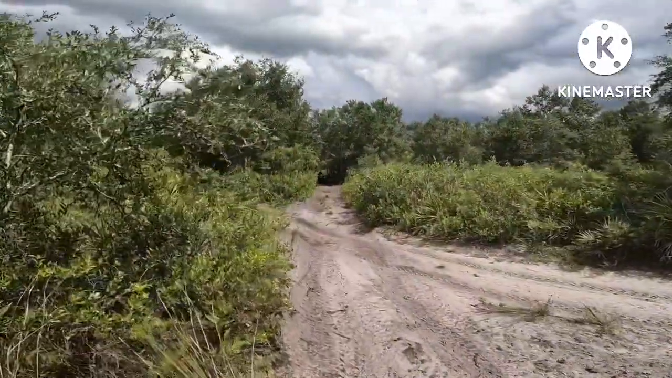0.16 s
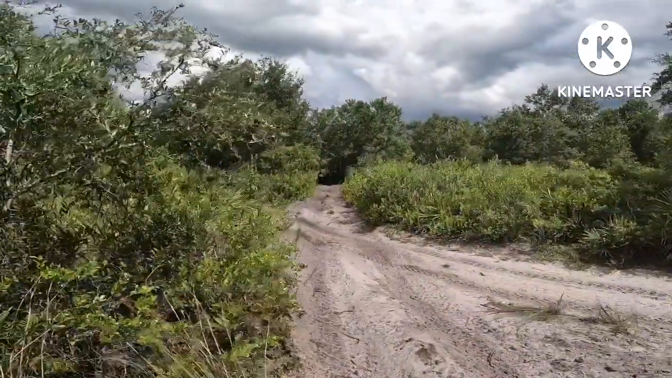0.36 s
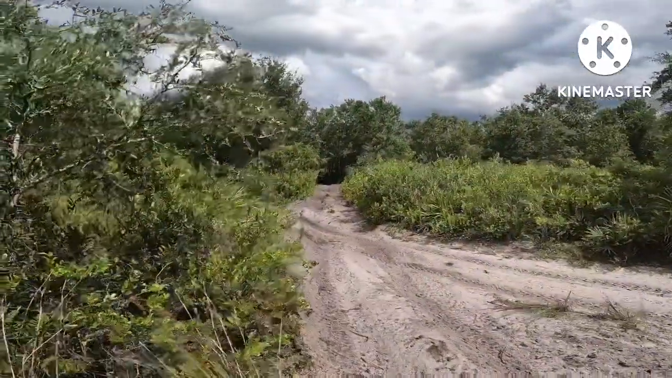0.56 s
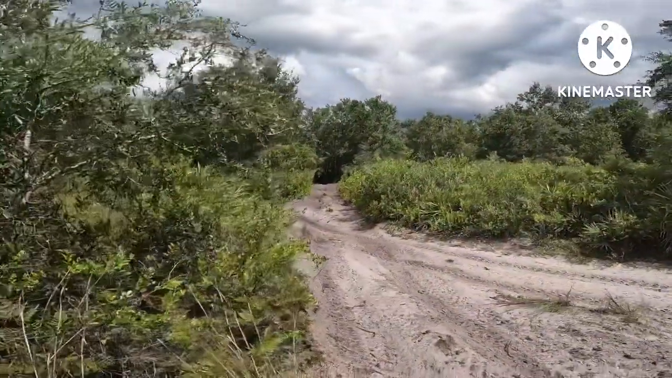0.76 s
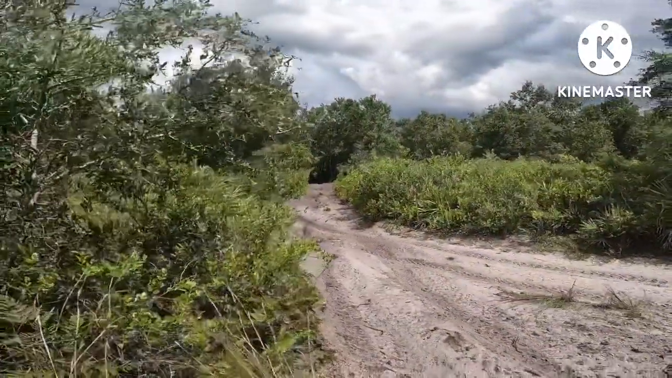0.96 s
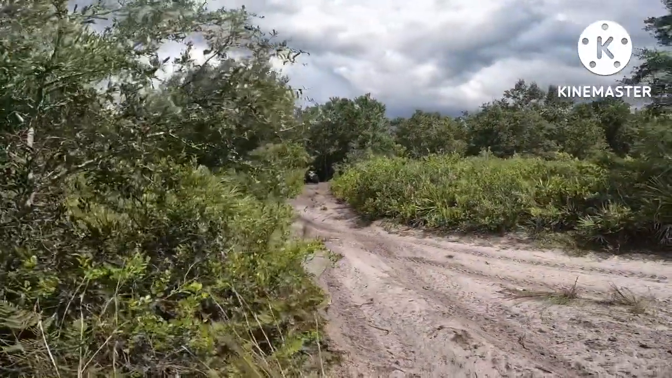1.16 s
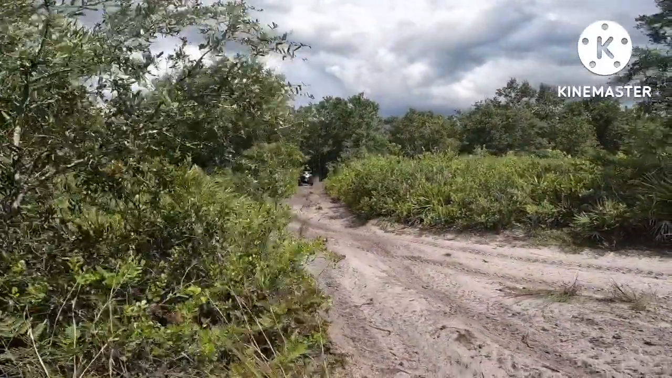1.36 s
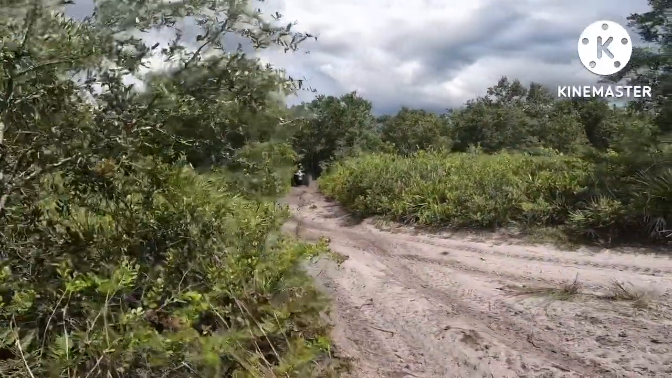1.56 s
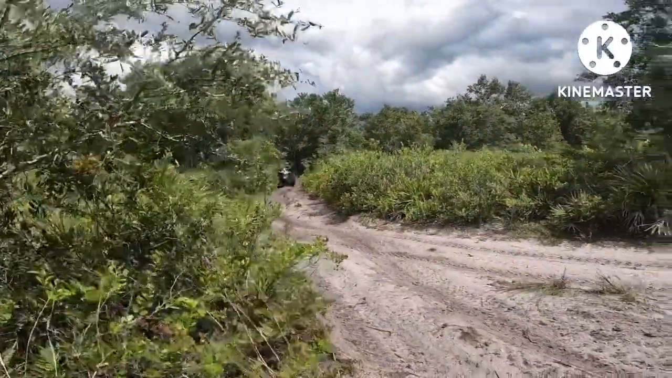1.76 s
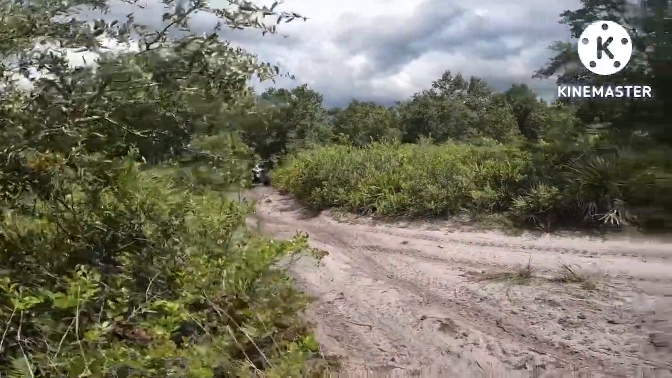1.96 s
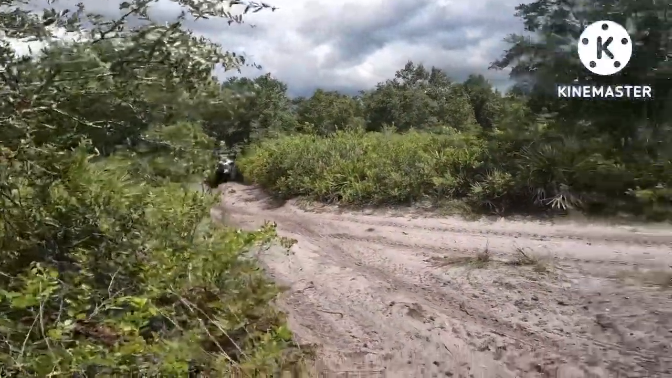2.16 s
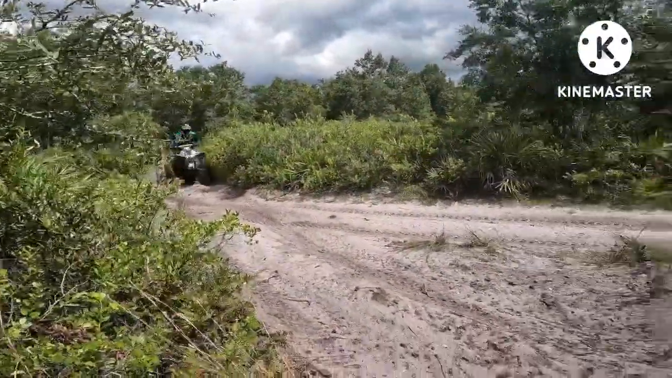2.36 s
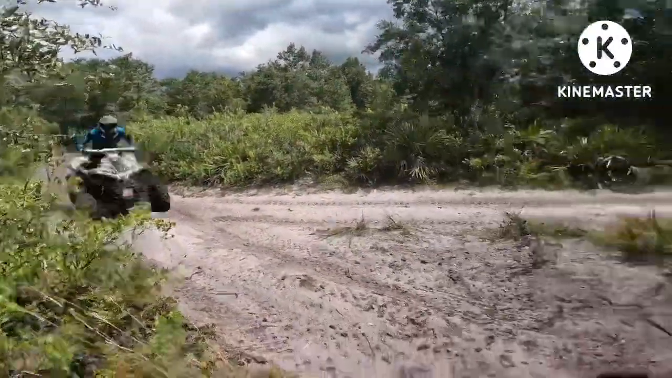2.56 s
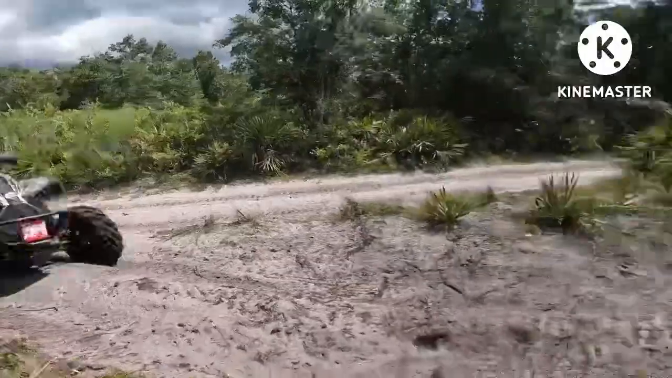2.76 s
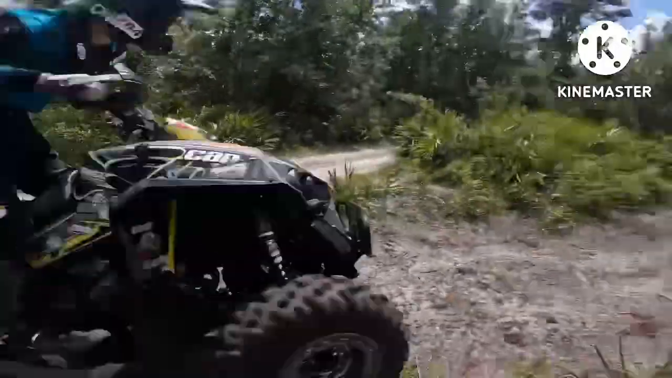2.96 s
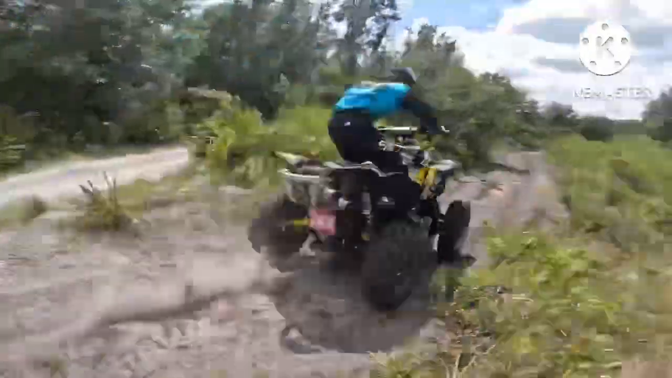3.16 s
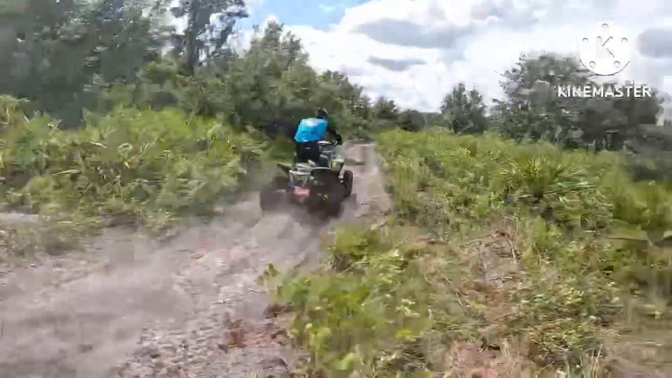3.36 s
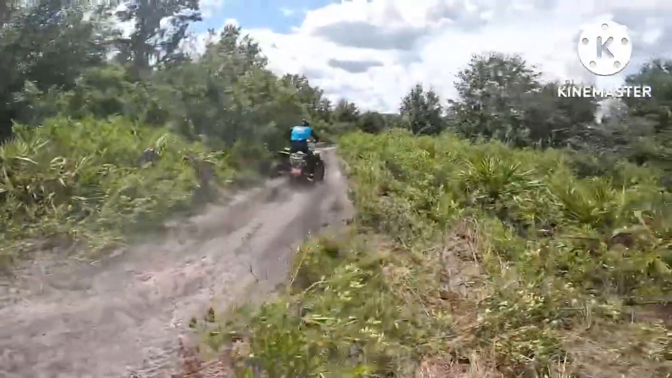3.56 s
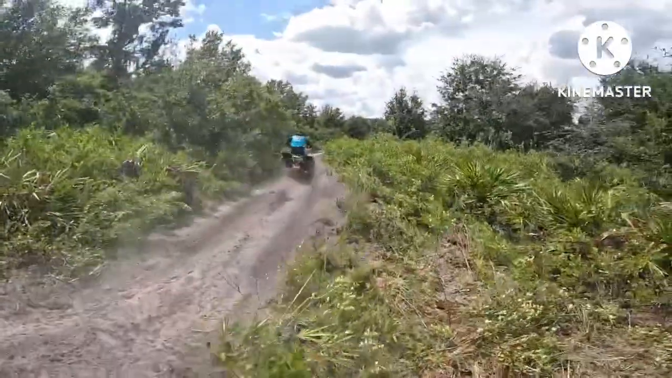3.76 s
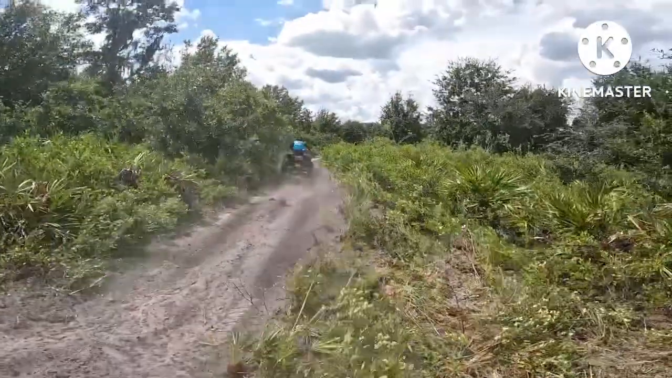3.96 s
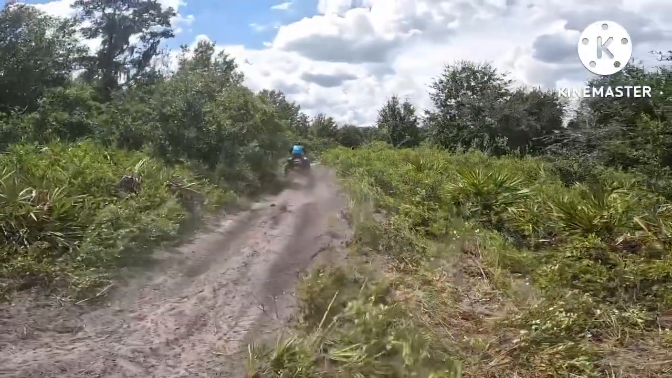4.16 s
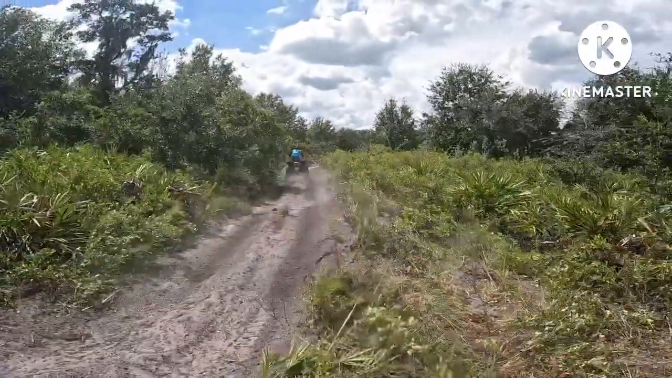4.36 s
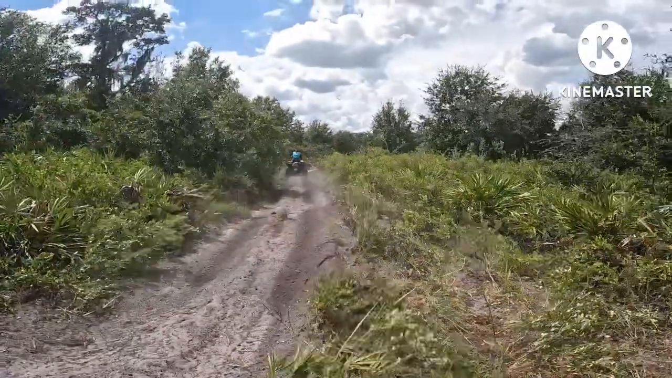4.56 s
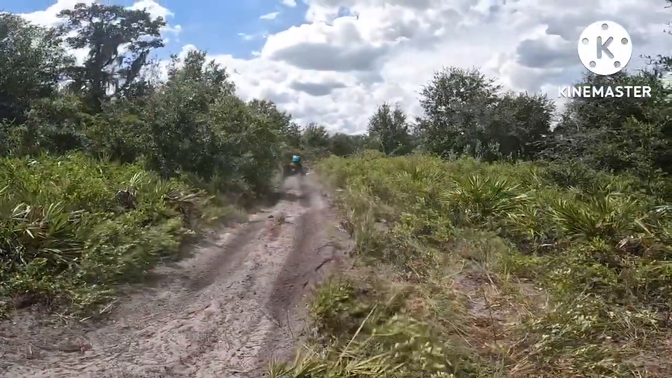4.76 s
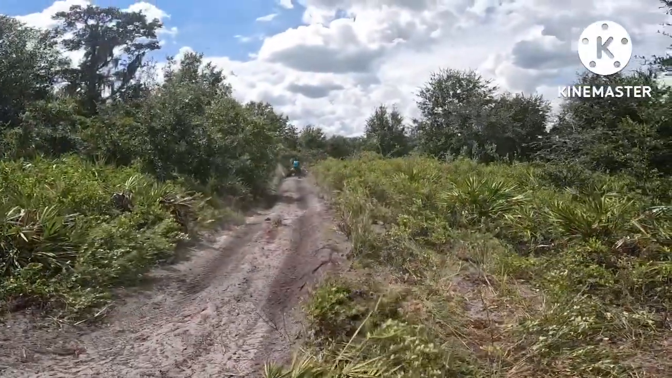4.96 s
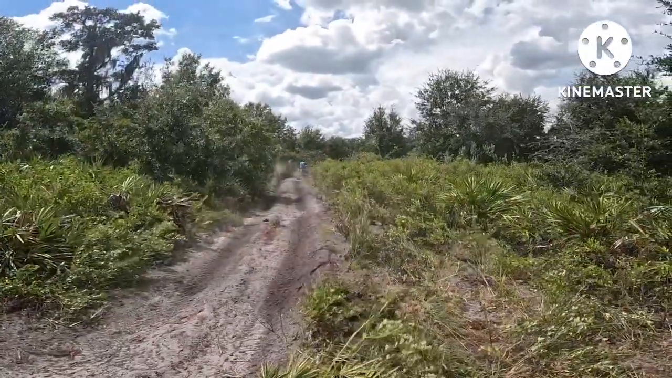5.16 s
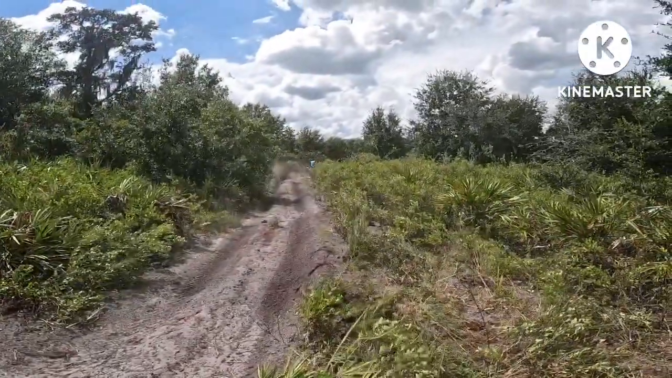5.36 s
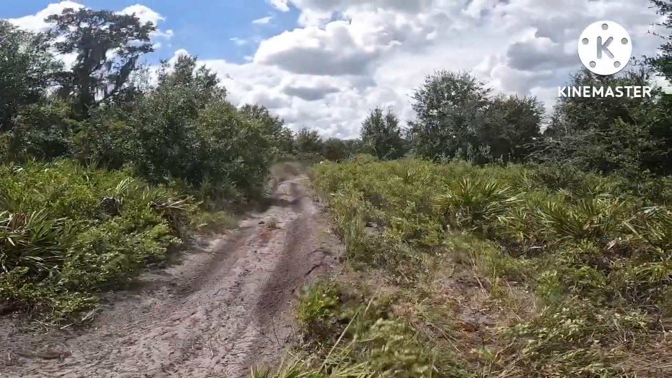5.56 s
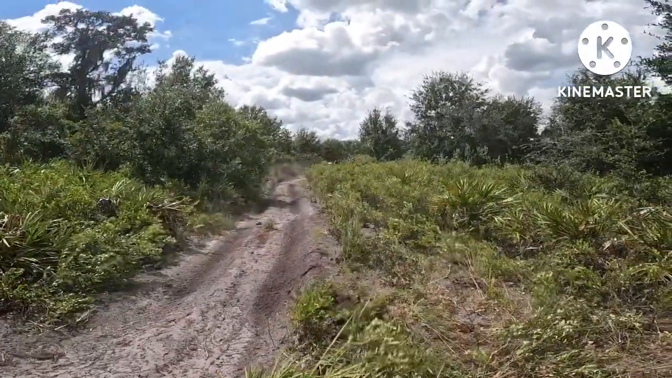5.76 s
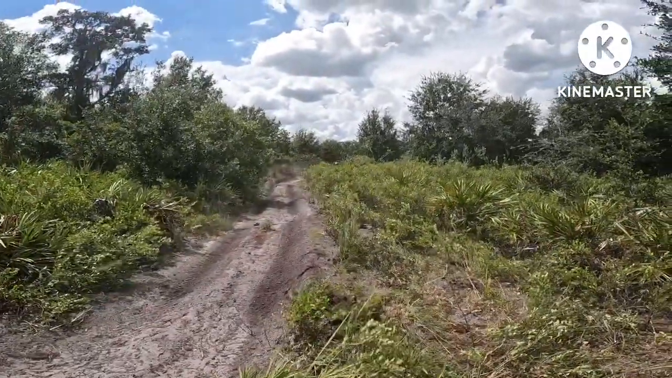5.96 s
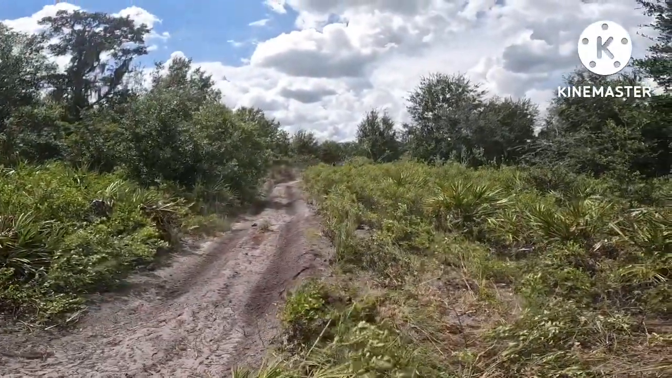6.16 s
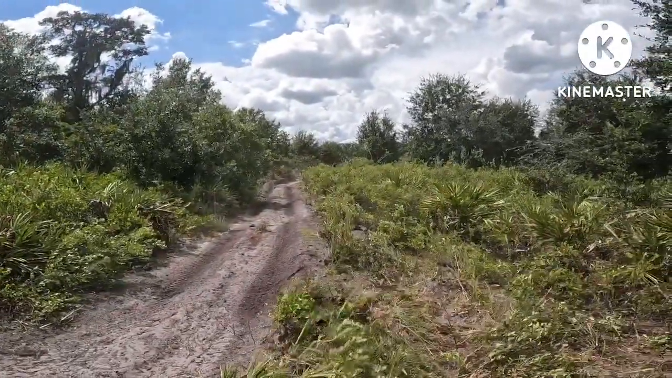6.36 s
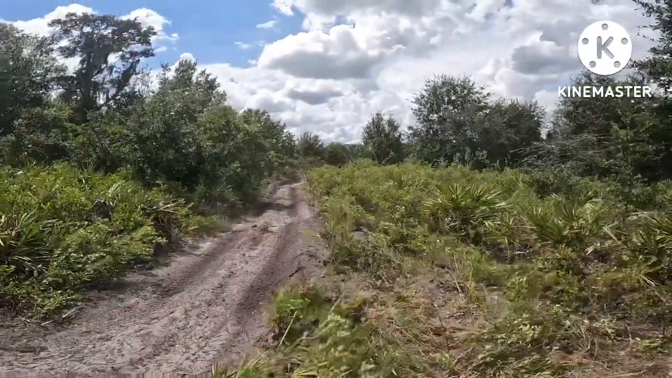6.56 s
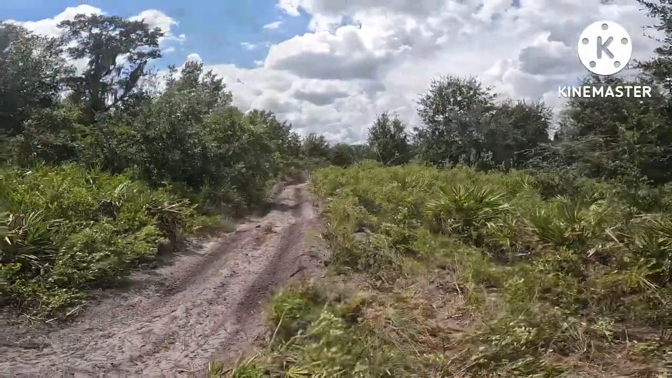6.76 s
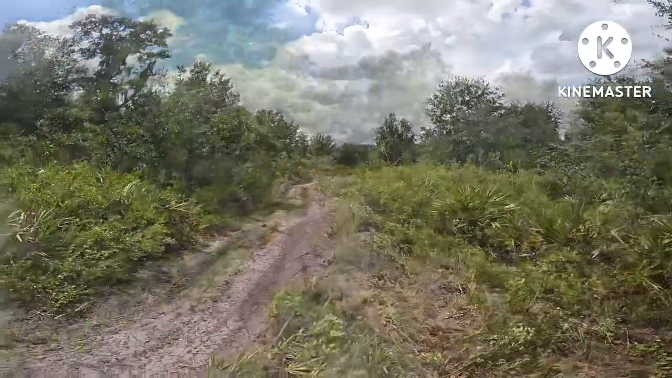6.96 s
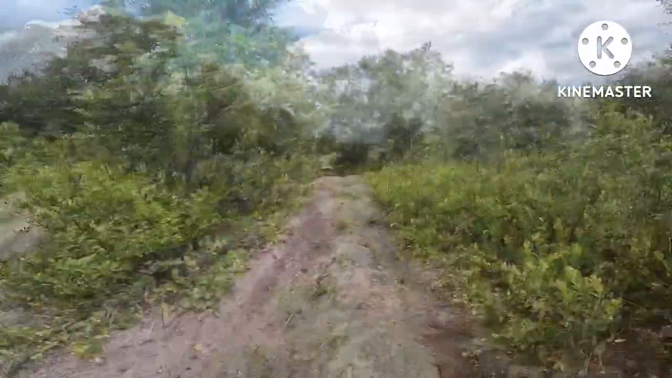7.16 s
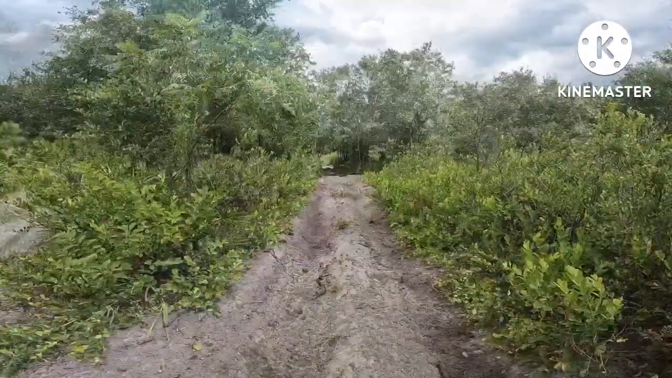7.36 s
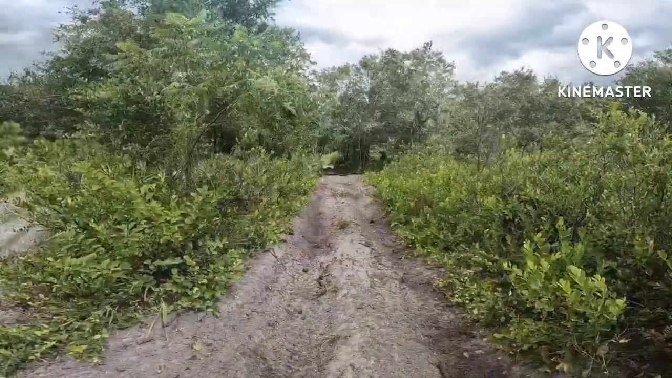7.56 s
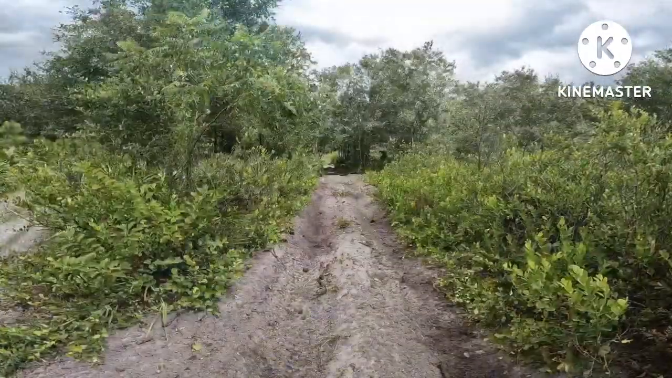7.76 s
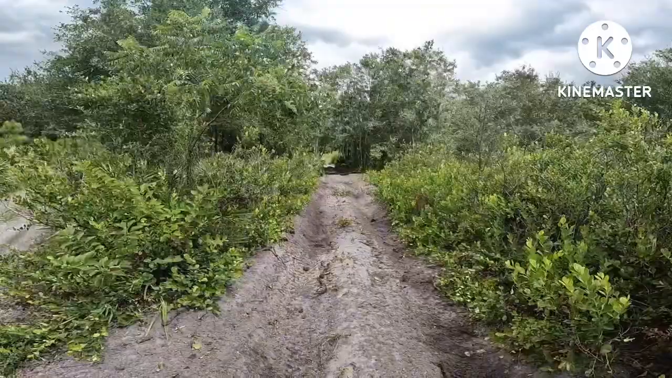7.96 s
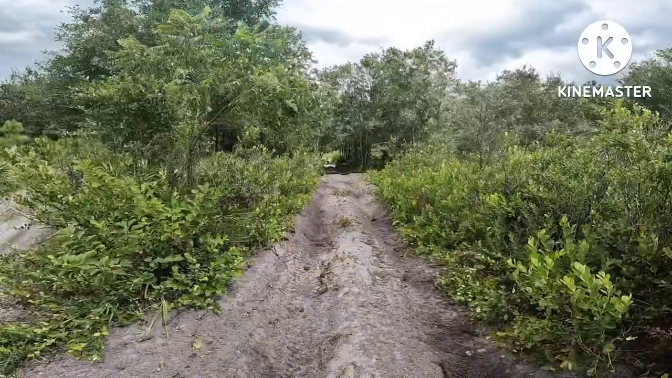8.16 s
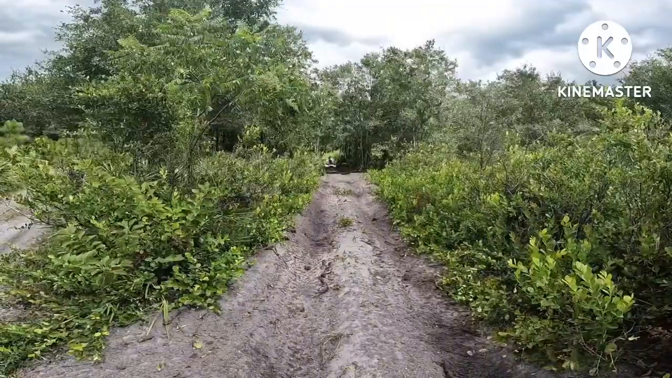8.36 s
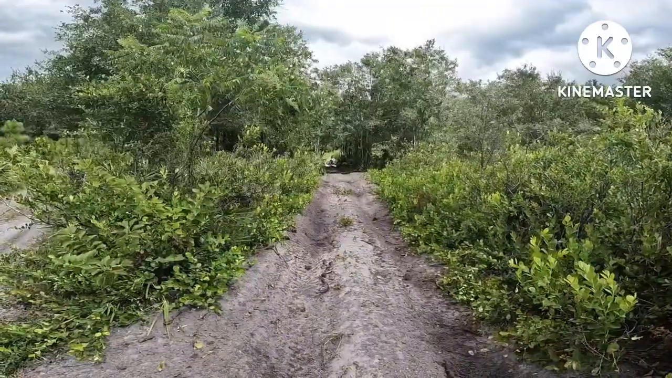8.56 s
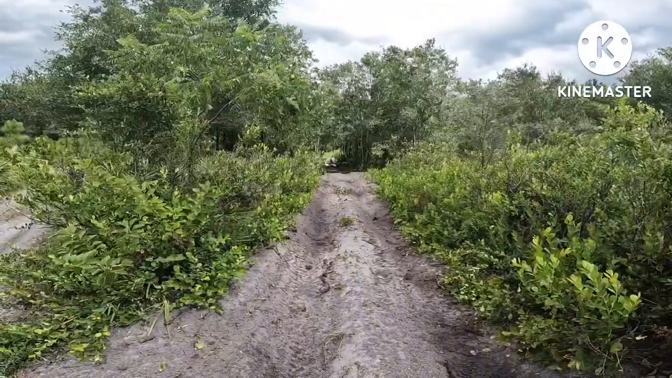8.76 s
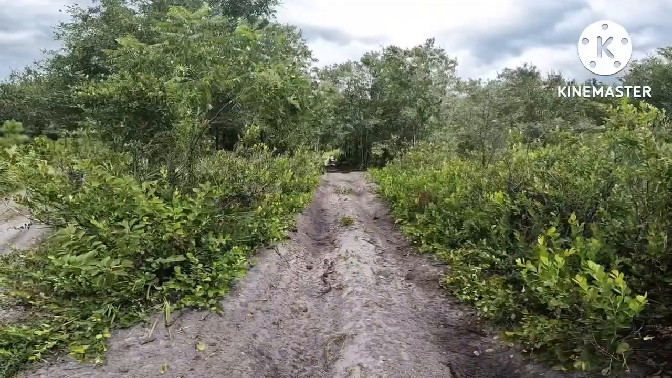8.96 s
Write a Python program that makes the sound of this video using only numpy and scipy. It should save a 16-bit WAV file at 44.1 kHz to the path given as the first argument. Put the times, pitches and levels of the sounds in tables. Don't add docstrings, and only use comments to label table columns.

```python
import sys
import numpy as np
from scipy import signal
from scipy.fft import rfft, irfft, next_fast_len
from scipy.io import wavfile
from scipy.ndimage import uniform_filter1d, map_coordinates

SR = 44100
rng = np.random.default_rng(int(sys.argv[2]) if len(sys.argv) > 2 else 0)


def boost(x):
    u = np.asarray(x, float) / 20
    return 10 ** u


def waveform_to_disk(signal):
    frames = np.transpose(np.atleast_2d(signal))
    scaled = np.clip(frames, -1, 1) * 32767
    samples = np.round(scaled).astype(np.int16)
    wavfile.write(sys.argv[1], SR, samples)


N = 397782

# first pulse t/s, shutting t/s, starting revs/(cycles/s), ending revs/(cycles/s), throttle/0-1
BLIPS = [(0, .492, 57, 62.5, 1), (.583, 1.506, 52, 54.3, 1), (1.62, 2.374, 49.8, 53.5, 1),
         (2.474, 2.574, 50.3, 49.5, 1), (2.698, 2.826, 46.8, 50, 1), (2.955, 3.05, 43.9, 45.5, 1),
         (3.215, 3.335, 40.1, 40.8, 1), (3.37, 3.497, 40.6, 38.8, .8), (4.628, 4.665, 26.8, 27.6, 1),
         (4.724, 5.139, 29, 53.1, 1), (5.242, 5.573, 45.7, 49.5, 1), (5.653, 6.253, 43.6, 53.2, 1),
         (6.442, 6.52, 41.3, 42.5, .7), (6.645, 6.8, 38.8, 40.7, .5), (6.921, 7.0, 38.1, 39.6, .7),
         (7.217, 7.25, 35, 36.2, .5), (7.905, 8.34, 30.4, 48.3, .8), (8.525, 9.05, 38.5, 57.2, .9)]
# start level/dB, crest level/dB, end level/dB
BITES = [(-6, 2, -2.5), (-2.5, -1.4, -0.2), (-1, -1.5, -4.5), (-8, -6, -6), (-4.5, -4, -6),
         (-4.5, -2.5, -6), (-2.5, -3, 6), (0.5, -1.8, 3), (-1, 8.5, 21), (-6.5, -1.5, 1.5),
         (1.5, -1.5, -1.3), (-1.5, -0.5, -2.5), (4.5, 3, 2), (1, -4, -10), (5, 3, 1), (12, -11, 10),
         (-10, 4, -4), (-0.5, 1.5, -1)]
# t/s, change/(cycles/s), rise/s, fall/s
RUTS = [(.2, -4, .2, .22), (.68, -1.3, .1, .04), (.8, 2.9, .1, .25), (1.21, 9, .25, .11),
        (1.4, -1.6, .08, .07), (2.16, 6.8, .4, .18), (2.61, -2.4, .07, .06), (3.84, -2, .17, .12),
        (4.27, 2.1, .15, .2), (4.52, -.9, .1, .08), (4.96, 1.8, .26, .14), (5.3, -2.9, .09, .23),
        (5.74, -1.8, .12, .08), (5.88, 4.8, .16, .16), (6.1, -1.7, .08, .11), (6.58, -1.3, .08, .03),
        (7.31, 2.9, .09, .25), (8.04, -2, .17, .13), (8.82, 3.3, .32, .2)]
# t/s, lag/cycles, throttle/0-1
TRAILING = [(.492, .36, .75), (3.05, .3, .4), (3.215, .355, 1), (3.335, .33, .45), (3.37, .35, .8),
            (3.497, .335, .35), (3.82, .36, .65), (3.86, .385, .35), (4.37, .37, 0), (7.65, .35, 0)]
# t/s, aspect/(0 ahead, 1 behind, 2 far), crackle/0-1, coasting scatter/0-1
HEARD = [(3.4, 0, .25, .09), (4.6, 1, .75, .1), (6.2, 1, .75, .1), (6.4, 2, .85, .15), (7.3, 2, .85, .45),
         (7.9, 2, .25, .2), (8.3, 1.8, .25, .1), (8.55, .4, .3, .1)]
# t/s, level/dB, nearness/dB, aim of the tail pipe/dB, ground echo on the boom/dB
RIDE = [(0, -24.5, -10.5, -7, 2.5), (.35, -21.5, -4.5, -14.5, 0), (.7, -22, -5, -8.5, 2),
        (1.7, -21, 3, -10, 1.5), (2.3, -18.5, 4.5, -9.5, -1), (2.75, -18.5, 7, -4, 1.5),
        (3.1, -19, 5.5, -4, 4), (3.27, -23, 14.5, -3, 7.5), (3.55, -23, 9.5, -3.5, 8),
        (3.9, -27, 13.5, -4, 7), (4.3, -26, 14.5, -3, 2), (4.5, -16, 2.5, -3.5, -4),
        (5.1, -19.5, -4.5, -4, 1), (6.2, -19.5, -9, -7.5, 1.5), (7.0, -24.5, -15.5, -2, 6.5),
        (7.6, -23, -10.5, -14.5, -0.5), (8.15, -24, -7.5, -16, 8), (9.02, -23, -8.5, -15, 2.5)]
# middle order, level/dB, share of nearness, share of boom, change when shut/dB
GROUPS = [
    (1.699, 6, 0.012, 1.42, -3),
    (3.2, 0.5, 0.091, 0.12, 1.5),
    (5.3, -1.5, 0.48, 0.012, -4),
    (7.501, -2.5, 0.73, 0.0062, -18),
]
FAR_SHUT_DB = [0, 0, -2, -.5]
# f/Hz, width/Hz, level/dB
OPEN_PIPE = [(66, 360, 9.5), (121, 43, -17.5), (180, 57, 20), (286, 92, -36), (322, 49, -1), (440, 72, -56)]
# f/Hz, width/Hz, level/dB
SHUT_PIPE = [(95.3, 50, 8.5), (151.8, 36, 8), (249, 100, 1.5), (410, 190, 15)]
# f/Hz, level/dB
PIPE_GAIN = [(40, -20), (60, -12), (95, -2), (125, 1), (180, 2), (290, 0.5), (450, -6.5)]
# f/Hz, level/(dB per Hz)
RASPS = [
    [(290, -3), (500, -3.5), (579, -1.5), (785, -9.5), (1060, -2), (1240, -7), (1400, -5.5), (2640, -15),
     (4500, -45), (5850, -61), (9900, -120)],
    [(290, -33), (500, -3), (837, -8.5), (960, 2), (1040, -3.5), (1910, -10.5), (2120, -13), (3030, -16),
     (4500, -36.5), (5850, -69), (9900, -120)],
    [(240, -56), (400, -3), (495, -10.5), (588, -6.5), (975, -1.5), (1720, -15.5), (2110, -21), (4500, -40),
     (5850, -61), (9900, -120)],
]
# f/Hz, level/(dB per Hz)
HISS = [(1470, -18), (2500, -7.5), (3030, -7), (3660, -9.5), (5540, -13.5), (7190, -15), (10700, -28.5),
        (13100, -38), (15600, -57.5)]
# t/s, level/dB
HISS_OVER_RASP = [(0, 0.5), (.03, -9), (3.0, -11.5), (3.16, -9.5), (3.3, -11.5), (5.2, -11), (5.4, -6.5),
                  (5.55, -18.5), (7.6, -19), (8.5, -10)]
# t/s, end t/s, order, level/dB
HOWLS = [(3.2, 3.33, 6, -17), (3.22, 3.33, 11, -24), (3.4, 3.8, 6, -22), (3.53, 3.78, 11, -33),
         (3.86, 4.36, 5, -24), (3.9, 4.36, 4, -31)]
# t/s, half length/s, level/dB
SQUEALS = [(2.508, 0.067, -37), (2.83, 0.067, -33), (3.033, 0.051, -41)]
# f/Hz, t60/s
SCRUB_T60 = [(60, 0.63), (300, 1), (1000, 0.067)]
# t/s, level/dB
BUFFET = [(3.6, -45), (3.976, -41), (4.092, -28.5), (4.182, -25), (4.232, -26.5), (4.396, -37.5),
          (4.54, -31.5), (4.692, -36), (4.9, -42)]
# f/Hz, level/(dB per Hz)
GUST = [(8, -40), (18, -3.5), (35, -1), (80, -7), (250, -14), (900, -40), (1500, -120)]
# f/Hz, likeness/0-1
ALIKE = [(400, .93), (950, .97), (2400, 0.94), (5000, 1), (9000, 0.99), (13000, 0.44)]
# f/Hz, level/dB
LEAN = [(150, 0), (300, -.6), (600, 0), (1200, -.3), (2500, .1), (5000, .9), (9000, 2), (13000, 2.8)]

LEAD_S = .033
LAG_OPEN, LAG_SHUT = .375, (.285, .32, .32)
STEADY, SETTLE_S, WORST = .03, .011, .15
JUMP_DB, JUMP_BEHIND_DB = 6, 16.5
REV_DB = .1923
DUST_S, DUST_WIDE_S, DUST_DB = 3.15, .067, 10
FRONT_S = .0004
TAIL_DB, TAIL_S = -9, .07
SQUEAL_HZ, SQUEAL_WIDE_HZ = 1082, 25
HOLLOW_S, HOLLOW_HZ, HOLLOW_WIDE_HZ = (3.33, 3.4, 3.75, 3.85), 322, 55


def revs():
    on, off, low, top, _ = np.transpose(BLIPS)
    t = np.arange(N) / SR
    turning = np.interp(t, np.ravel([on, off], "F") - LEAD_S, np.ravel([low, top], "F"))
    for s, extra, rise, fall in RUTS:
        turning = turning + np.interp(t, [s - rise, s, s + fall], [0, extra, 0])
    return turning


def changes():
    s, aspect, crackle, coasting = np.transpose(HEARD)
    rows = {}
    for _, off, *_ in BLIPS:
        if off < N / SR:
            shut_lag = np.interp(np.interp(off, s, aspect), range(3), LAG_SHUT)
            rows[off] = (shut_lag, 0, np.interp(off, s, coasting))
    for on, off, _, _, throttle in BLIPS:
        rows[on] = (LAG_OPEN, throttle, min(WORST, STEADY + SETTLE_S / (off - on)))
    for at, lag, throttle in TRAILING:
        rows[at] = (lag, throttle, np.interp(at, s, coasting))
    return sorted((at, lag, throttle, .1 + throttle * np.interp(at, s, crackle), scatter)
                  for at, (lag, throttle, scatter) in rows.items())


def firings(speed):
    turns = np.cumsum(speed) / SR
    table = changes()
    stops = [row[0] for row in table[1:]] + [N / SR]
    rows = []
    for (s, lag, throttle, crackle, scatter), stop in zip(table, stops):
        first, last = np.interp([s * SR, stop * SR], np.arange(N), turns)
        chance = rng.standard_normal((60, 2, 2))
        when = first + np.arange(60)[:, None] + [0, lag] + .098 * scatter * chance[..., 0]
        size = boost(np.array([0, -2.5]) + 9 * scatter * chance[..., 1])
        keep = when < last - .12
        cylinder = np.broadcast_to([0, 1], when.shape)[keep]
        samples = np.interp(when[keep], turns, np.arange(N))
        rows += [(at, g, throttle, crackle, c) for at, g, c in zip(samples, size[keep], cylinder)]
    return np.transpose(rows)


def opening(slew_s, early_s=0):
    s, _, throttle, *_ = np.transpose(changes())

    def step(ahead_s):
        return throttle[np.searchsorted(s, np.arange(N) / SR + ahead_s, "right") - 1]

    return uniform_filter1d(np.minimum(step(.006), step(.006 + early_s)), max(int(slew_s * SR), 1))


def bite():
    on, off = np.transpose(BLIPS)[:2]
    crest = on + .65 * (off - on)
    return np.interp(np.arange(N) / SR, np.ravel([on, crest, off], "F"), np.ravel(BITES))


def exhaust(at, size, throttle):
    load = np.clip(throttle, 0, 1) ** 2
    sharp = filtered(train(at, size * load),
                     lambda hz: pipe(OPEN_PIPE)(hz) * muffler(low_hz=48, top_hz=440)(hz))
    rounded = filtered(train(at, size * (1 - load)),
                       lambda hz: pipe(SHUT_PIPE)(hz) * muffler(low_hz=58, top_hz=250)(hz))
    pulses = -unit(sharp + rounded)
    pulses = pulses + boost(-18) * scrub(pulses)

    speed = revs()
    shut = 1 - opening(slew_s=.034)
    level_db, near_db, _, boom_db = curves(RIDE)
    aspect = curves(HEARD)[0]
    closeness_db = near_db + .23 * bite() * (1 - shut)
    parts = by_order(pulses, speed, edges=(2.5, 4.5, 6.5))
    tone = 0
    for part, (order, db, share, low, shut_db), far_db in zip(parts, GROUPS, FAR_SHUT_DB):
        group_db = level_db + db + along(PIPE_GAIN, order * speed)
        group_db = group_db + share * closeness_db + low * boom_db + shut * (shut_db + far_db * aspect)
        tone = tone + boost(group_db) * even(part, .014)
    return tone


def pipe(modes):
    return lambda f: sum(boost(db) * 1j * f * w / (c * c - f * f + 1j * f * w) for c, w, db in modes)


def muffler(low_hz, top_hz):
    return lambda hz: signal.freqs(*signal.butter(4, [low_hz, top_hz], "band", analog=True), hz)[1]


def by_order(x, speed, edges):
    turns = np.cumsum(speed) / SR
    count = 2 ** 17
    angle = np.linspace(0, turns[-1], count)
    spectrum = rfft(np.interp(np.interp(angle, turns, np.arange(N)), np.arange(N), x))
    order = np.arange(len(spectrum)) / turns[-1]
    below = [0] + [1 / (1 + (order / edge) ** 24) for edge in edges] + [1]
    return [np.interp(turns, angle, irfft(spectrum * (hi - lo), count)) for lo, hi in zip(below, below[1:])]


def jet(at, size, crackle, cylinder):
    level_db, _, aim_db, _ = curves(RIDE)
    aspect, facing, _ = curves(HEARD)
    shut = 1 - opening(slew_s=.012, early_s=.016)
    dust_db = DUST_DB * np.exp(-((np.arange(N) / SR - DUST_S) / DUST_WIDE_S) ** 2)
    rasp_db = level_db + aim_db - (JUMP_DB + JUMP_BEHIND_DB * facing) * shut
    rasp_db = rasp_db + bite() * (1 - shut) + dust_db + REV_DB * (revs() - 45)
    hiss_db = curves(HISS_OVER_RASP)[0] + 2.5 * shut

    t = np.arange(SR // 40) / SR
    share = np.clip(np.interp(np.arange(N), at, crackle), 0, .98)
    kick = size * boost(-6 * cylinder + 2.5 * rng.standard_normal(len(at)))

    def burst(t60):
        return even(signal.fftconvolve(train(at - .0023 * SR, kick), boost(-60 * t / t60))[:N], .015)

    gate = share * burst(.024) + (1 - share) * boost(2 * wobble(60))
    front = train(at - .002 * SR, kick) - train(at + (FRONT_S - .002) * SR, kick)
    shock = .8 * share * unit(front)
    rasp = 0
    for k, colour in enumerate(RASPS):
        fade = np.clip(1 - np.abs(aspect - k), 0, 1) ** .5
        rasp = rasp + fade * even(rush(colour, ALIKE, gate, shock), .025)
    hiss_gate = .71 * share * burst(.041) + (1 - 1.01 * share) * boost(1.5 * wobble(90))
    hiss = even(rush(HISS, ALIKE, hiss_gate), .077)
    gain = lingering(boost(rasp_db + wobble(8.9)))
    return gain * (rasp + boost(hiss_db) * hiss)


def lingering(gain):
    keep = np.exp(-1 / (TAIL_S * SR))
    tail = signal.lfilter([1 - keep], [1, -keep], gain ** 2)
    return np.sqrt(gain ** 2 + boost(2 * TAIL_DB) * tail)


def howl():
    t = np.arange(N) / SR
    turns = np.cumsum(revs()) / SR
    tones = 0
    for s, end, order, db in HOWLS:
        fade = np.interp(t, [s, s + .03, end - .03, end], [0, 1, 1, 0])
        tones = tones + boost(db + 3 + 1.5 * wobble(12)) * fade * np.sin(2 * np.pi * order * turns)
    return tones


def frame_ring():
    t = np.arange(N) / SR
    tone = unit(filtered(rng.standard_normal(N),
                         lambda hz: np.exp(-((hz - SQUEAL_HZ) / SQUEAL_WIDE_HZ) ** 2)))
    return tone * sum(boost(db) * np.exp(-((t - s) / half) ** 2) for s, half, db in SQUEALS)


def ground(x):
    depth = np.interp(np.arange(N) / SR, HOLLOW_S, [0, .8, .8, 0])
    return x - depth * filtered(x, lambda hz: np.exp(-((hz - HOLLOW_HZ) / HOLLOW_WIDE_HZ) ** 4))


def scrub(x):
    hz, t, z = signal.stft(rng.standard_normal(SR // 2), SR, nperseg=1024)
    tail = signal.istft(z * boost(-60 * t / along(SCRUB_T60, hz)[:, None]), SR, nperseg=1024)[1]
    smear = boost(3.5 * wobble(37))
    return unit(signal.fftconvolve(x * smear, tail)[:N])


def wind():
    s, db = np.transpose(BUFFET)
    level_db = np.interp(np.arange(N) / SR, s, db, left=-60, right=-60)
    lumps = boost(6.6 * np.array([wobble(3.97), wobble(6.6)]))
    gust = boost(level_db + 5) * unit(lumps * rush(GUST, [(30, .41)]))
    rumble = rush([(8, -10), (25, -16), (50, 2), (90, -21), (150, -120)], [(30, 1)])
    return gust + boost(-57 + 3.2 * wobble(2.5)) * rumble


def rush(spectrum, alike, gate=1, shock=0):
    def colour(hz):
        turn = np.arccos(np.clip(along(alike, hz), -1, 1)) / 2
        return boost(along(spectrum, hz)) * [np.cos(turn), np.sin(turn)]

    noise = gate * rng.standard_normal((2, N))
    mid, side = filtered(noise + [[1], [0]] * np.asarray(shock), colour)
    return unit(np.array([mid + side, mid - side]))


def train(at, size):
    return np.bincount(np.clip(at, 0, N - 1).astype(int), size, N)


def unit(x):
    return x / np.sqrt(np.mean(x ** 2) + 1e-20)


def even(x, seconds):
    span = int(seconds * SR)
    power = uniform_filter1d(uniform_filter1d(x ** 2, span), span)
    return x / np.sqrt(np.abs(power) + 1e-12)


def along(points, hz):
    f, v = np.transpose(points)
    return np.interp(np.log(hz + 1), np.log(f + 1), v)


def curves(rows):
    s, *cols = np.transpose(rows)
    return [np.interp(np.arange(N) / SR, s, c) for c in cols]


def wobble(rate):
    knots = rng.standard_normal(int(N * rate / SR) + 4)
    return map_coordinates(knots, [np.arange(N) * rate / SR])


def filtered(x, response):
    m = next_fast_len(N + SR // 2)
    return irfft(rfft(x, m) * response(np.fft.rfftfreq(m, 1 / SR)), m)[..., :N]


def scene():
    rows = firings(revs())
    at, size, throttle, crackle, cylinder = rows[:, np.argsort(rows[0])]
    quad = ground(exhaust(at, size, throttle) + jet(at, size, crackle, cylinder))
    return quad + howl() + frame_ring() + wind()


def top_cut(x):
    return signal.sosfilt(signal.butter(12, 15710, fs=SR, output="sos"), x)


def record(dry):
    def ports(hz):
        twist = .059 * np.exp(-(np.log((hz + 1) / 280) / .39) ** 2)
        return boost(np.outer([.5, -.5], along(LEAN, hz))) * np.exp(1j * np.outer([1, -1], twist))

    x = filtered(dry, ports)
    mix = x / (1 + np.abs(x / .85) ** 4) ** (1 / 4)
    return top_cut(mix)


dry = scene()
out = record(dry)
waveform_to_disk(out)
```